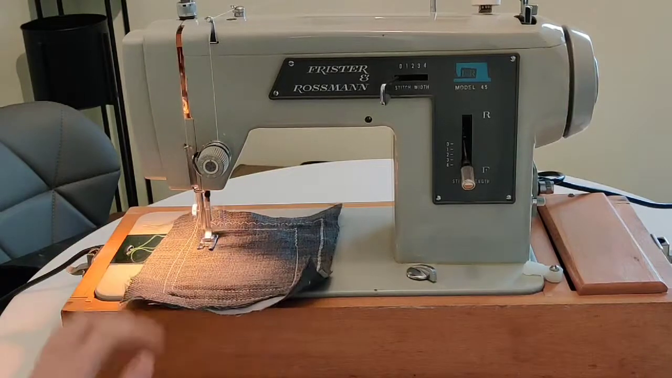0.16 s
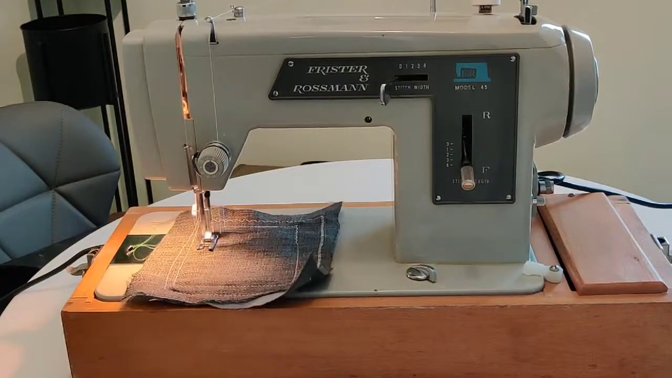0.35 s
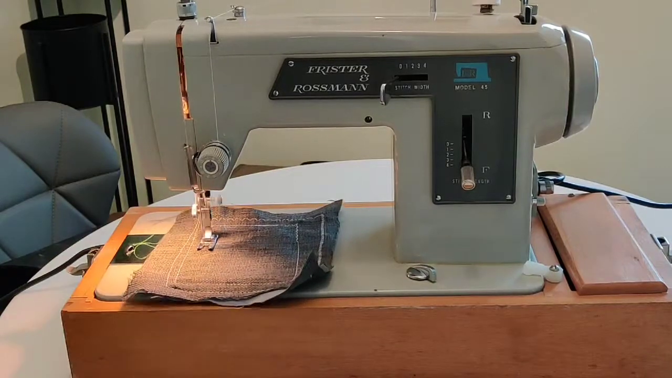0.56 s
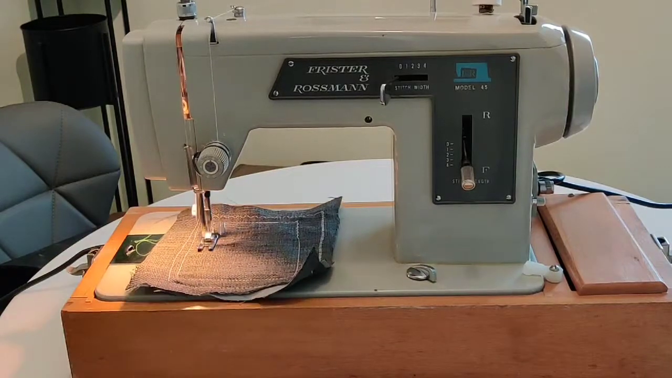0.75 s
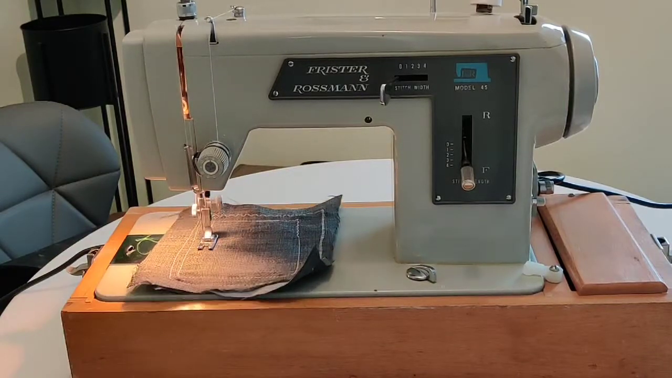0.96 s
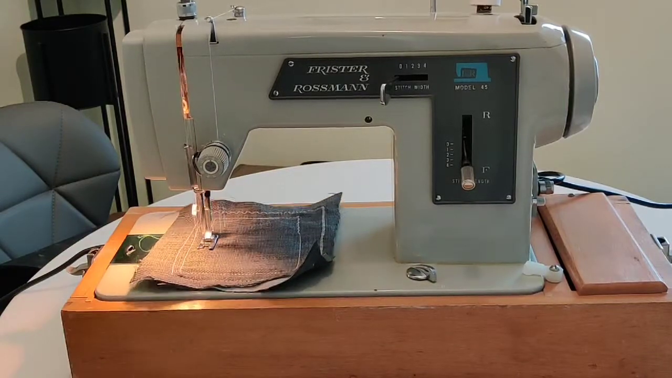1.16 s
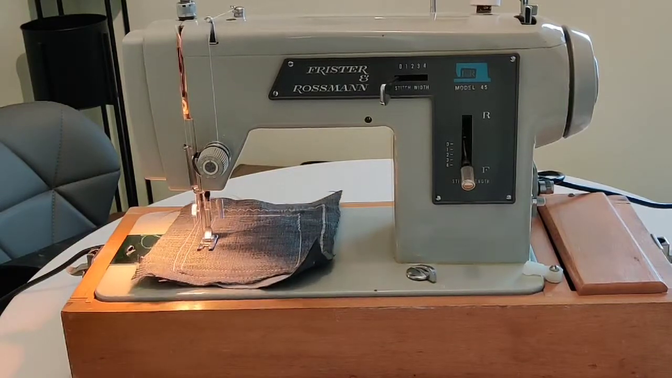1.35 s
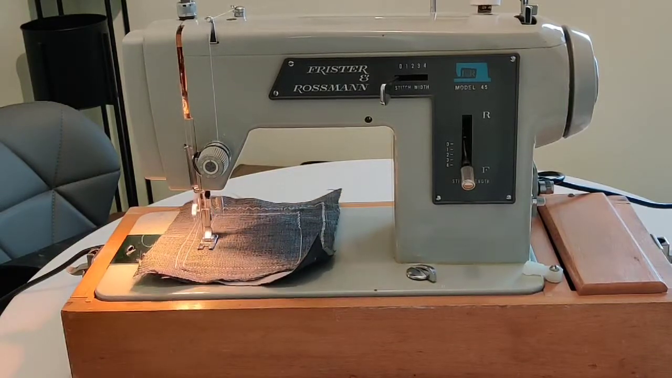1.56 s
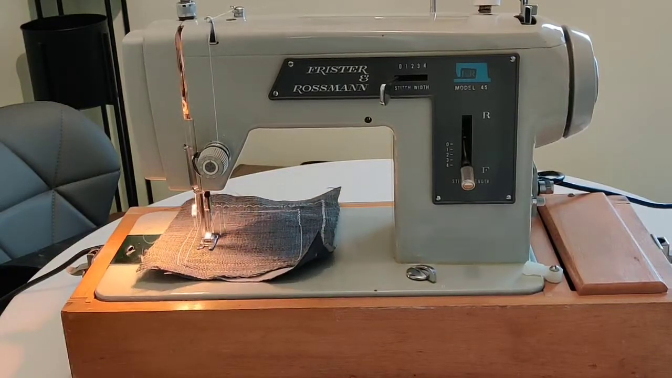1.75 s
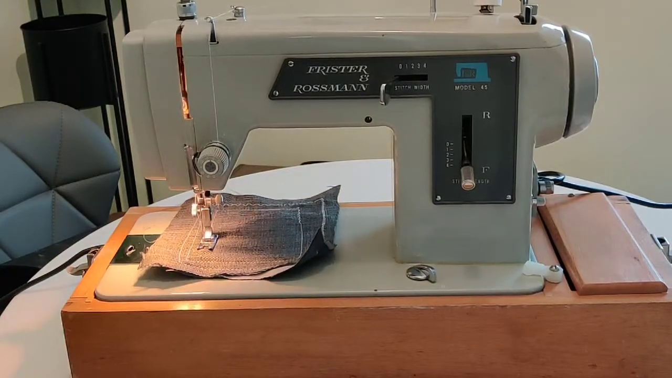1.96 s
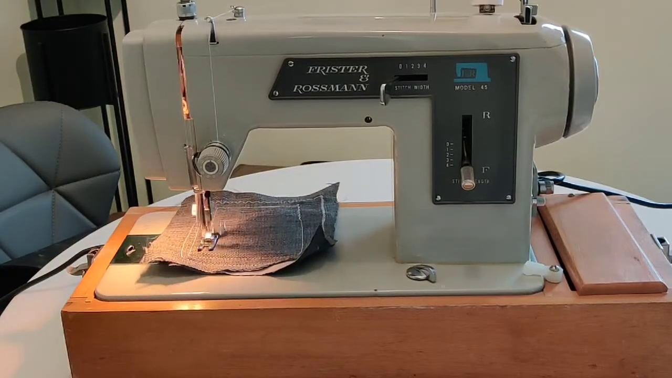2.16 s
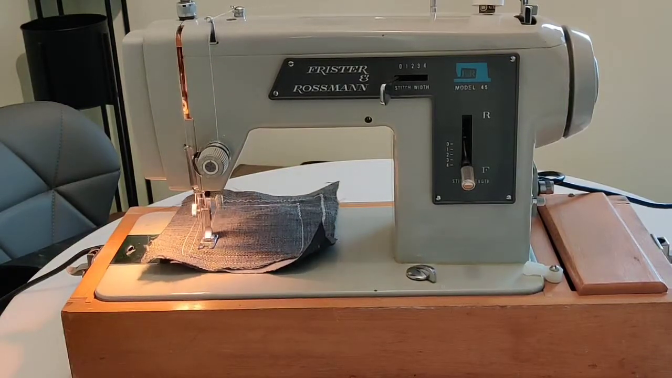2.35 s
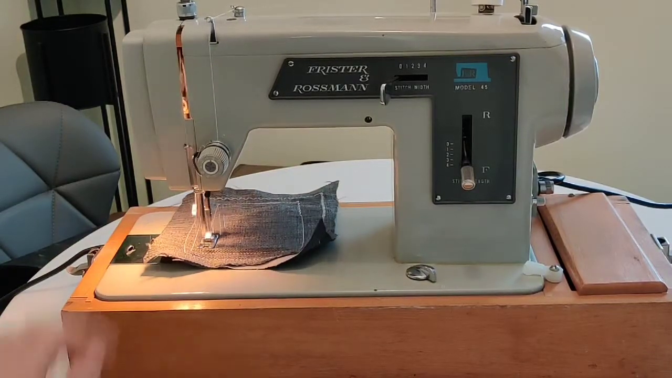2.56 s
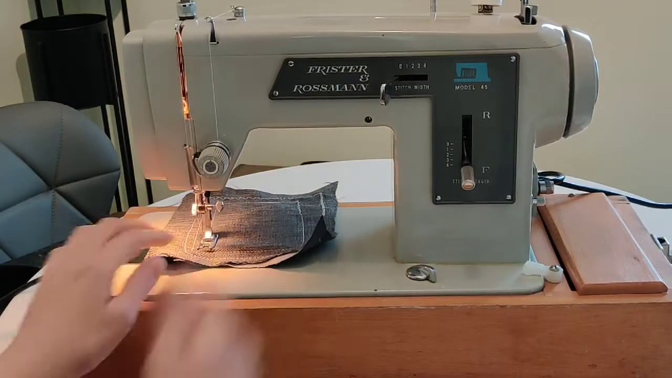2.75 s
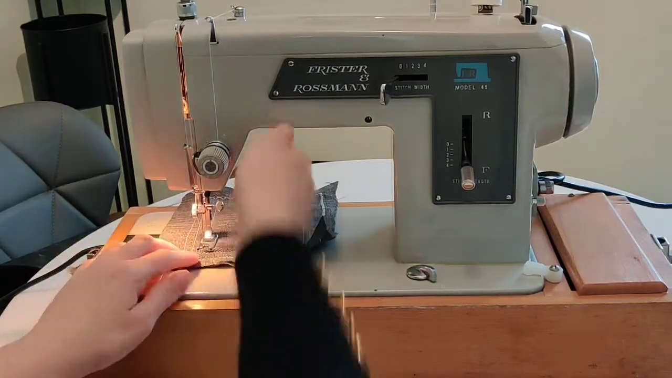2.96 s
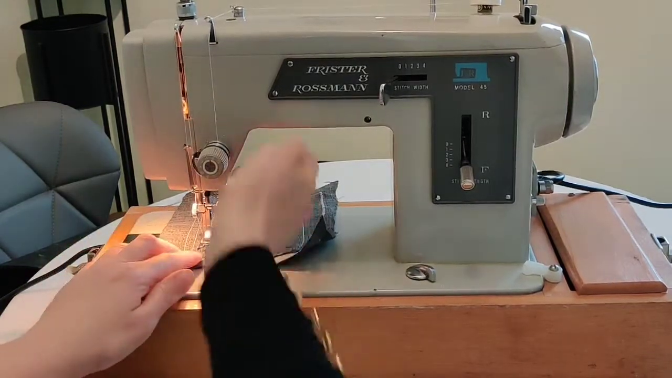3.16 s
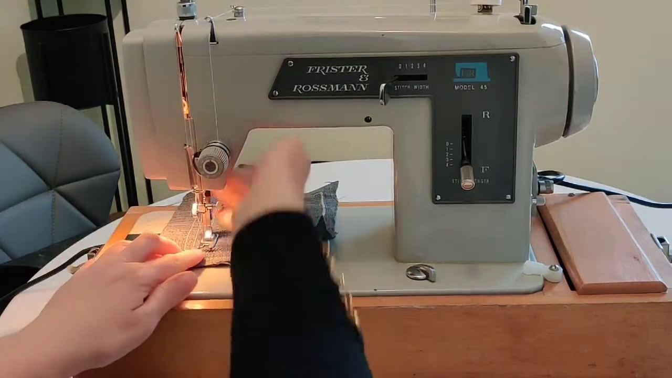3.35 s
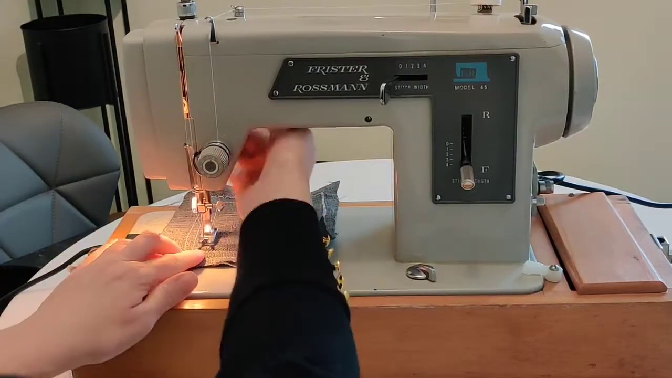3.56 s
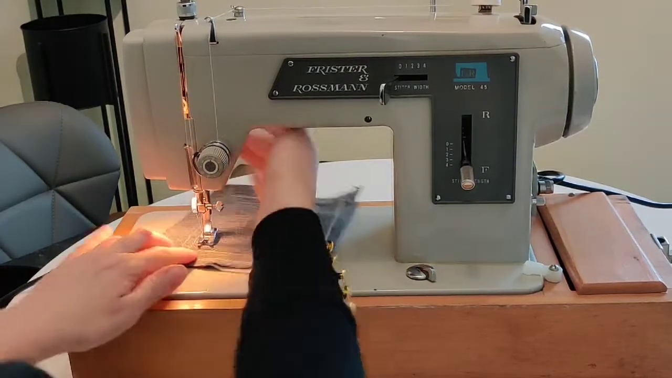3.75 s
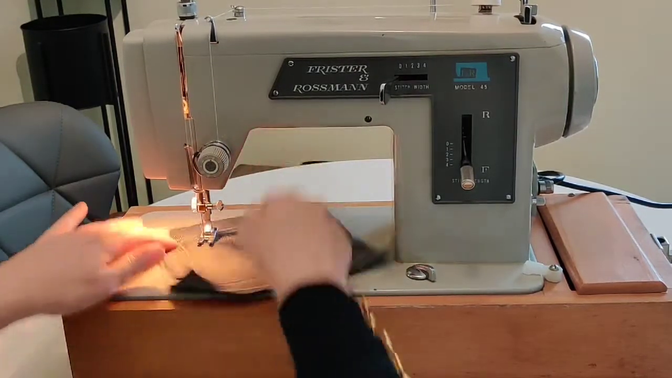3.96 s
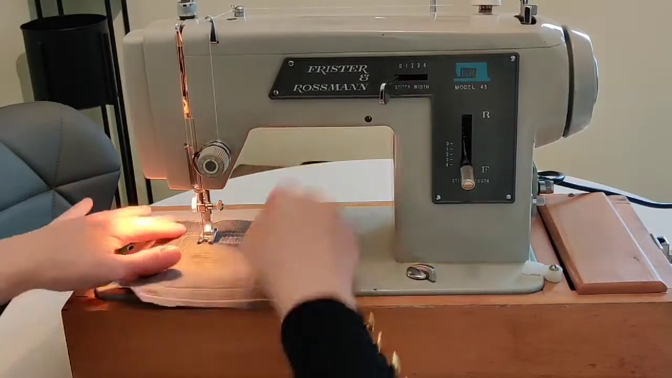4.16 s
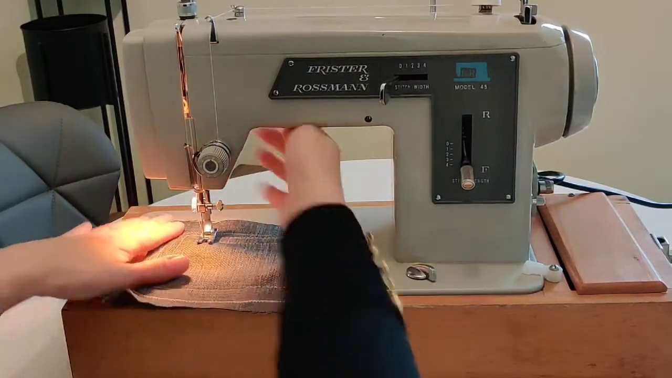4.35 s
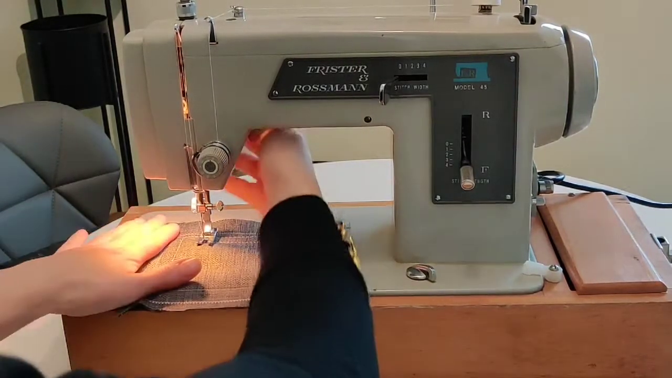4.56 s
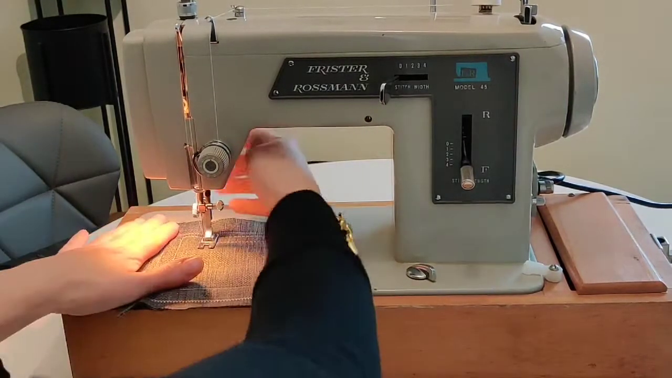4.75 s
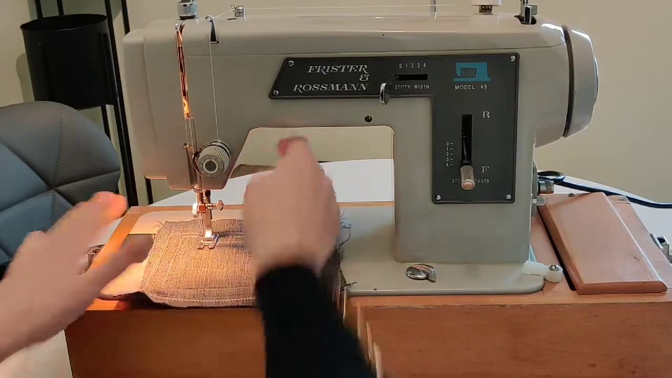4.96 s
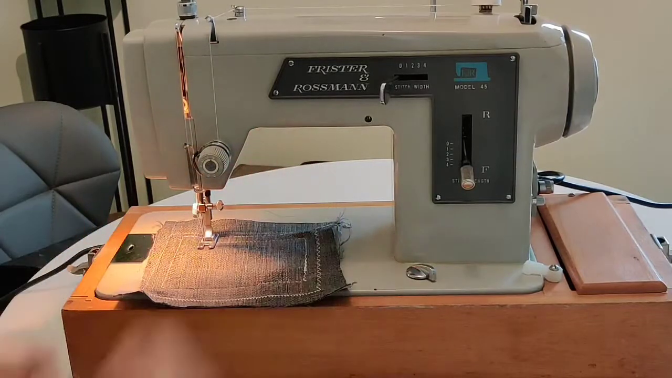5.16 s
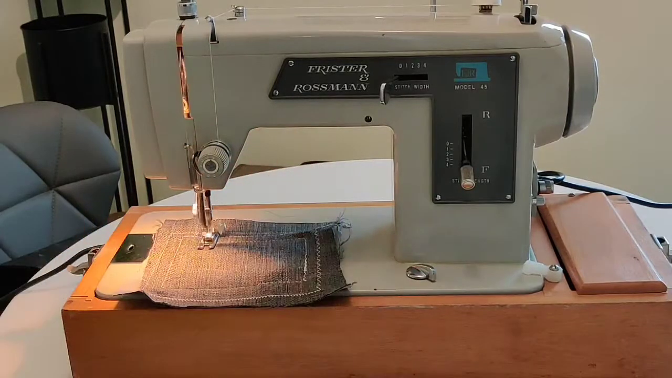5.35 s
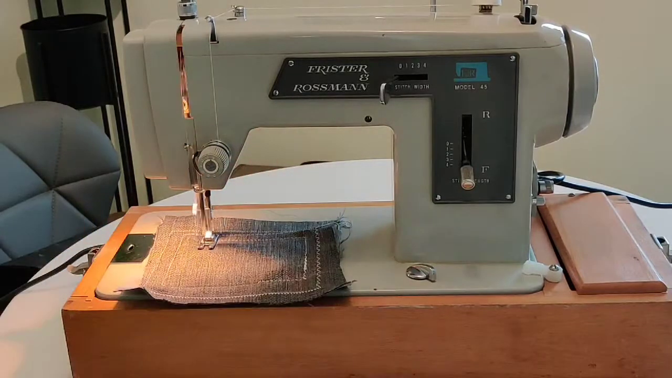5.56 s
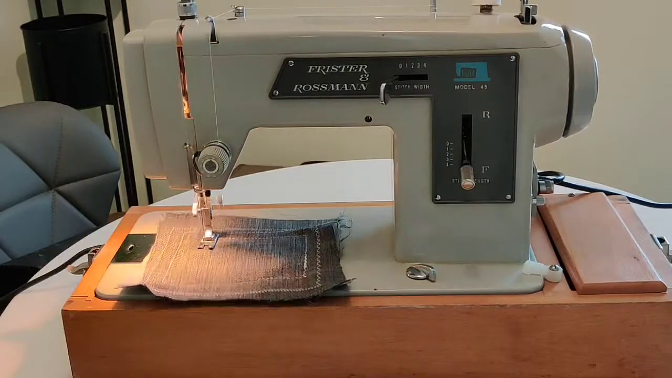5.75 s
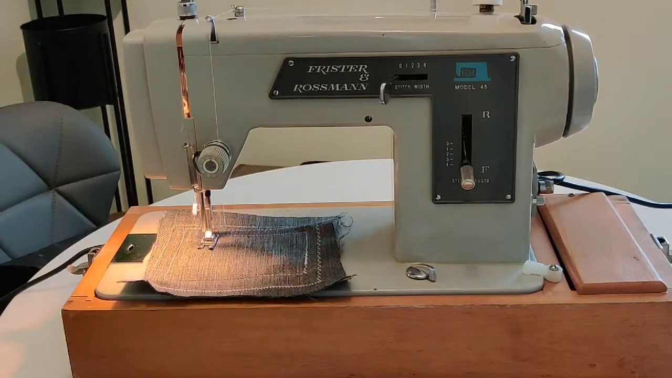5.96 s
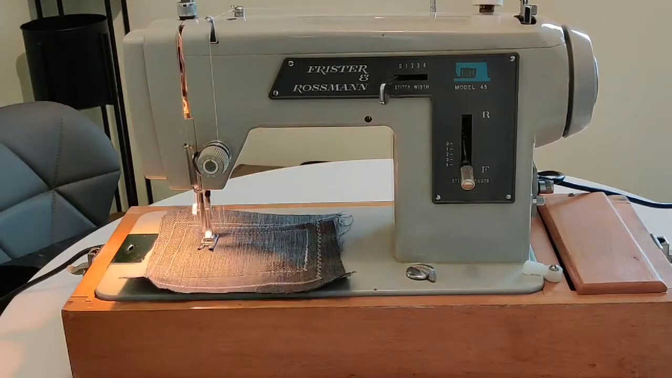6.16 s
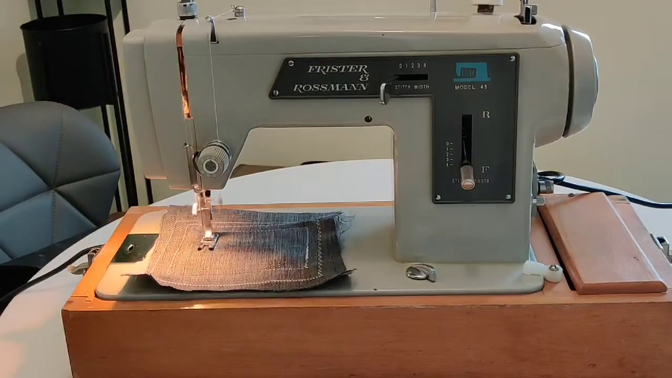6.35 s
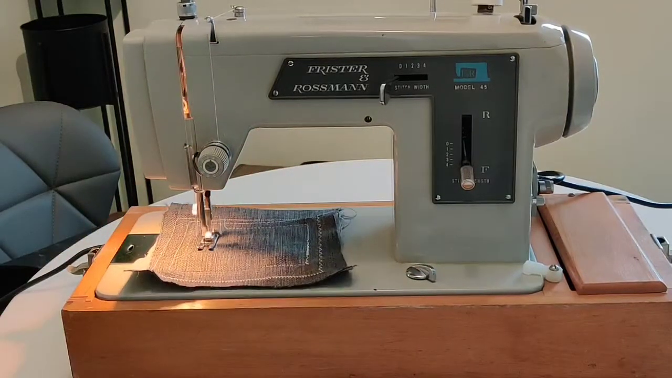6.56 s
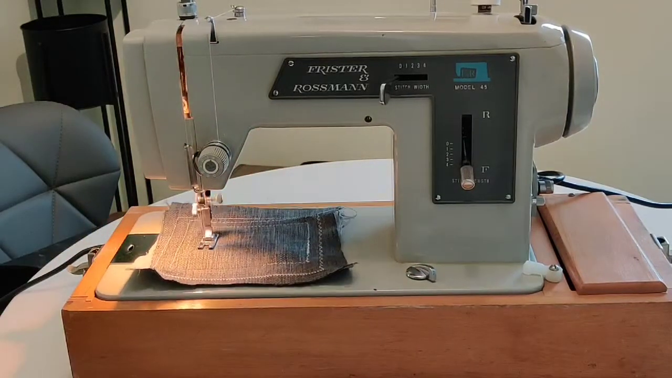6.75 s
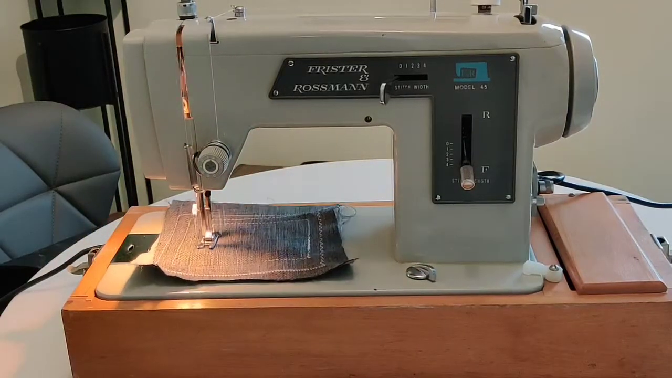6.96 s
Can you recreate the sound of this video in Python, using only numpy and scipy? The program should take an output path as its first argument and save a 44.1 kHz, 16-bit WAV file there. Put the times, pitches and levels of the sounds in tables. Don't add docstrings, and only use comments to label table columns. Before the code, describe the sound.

A heavy metal sewing machine already runs at the start, each stitch a double clack ringing the body over droning gears. It slows and stops; near quiet follows, with faint hum, dull fabric rustle, fingertip and knuckle knocks, and three bright lever snaps. Later clicks lead to a hesitant restart, a few separate clunks, then a steady run to the end. Close stereo microphone, small room.

```python
import sys
import numpy as np
from scipy import signal
from scipy.fft import rfft, irfft, next_fast_len
from scipy.io import wavfile
from scipy.ndimage import uniform_filter1d

SR = 44100
rng = np.random.default_rng(int(sys.argv[2]) if len(sys.argv) > 2 else 0)


def invert_db(level):
    return 10 ** (np.asarray(level, dtype=float) / 20)


def wrap_up_sound(samples):
    columns = np.atleast_2d(samples).T
    tamed = np.clip(columns, -1, 1)
    steps = np.round(tamed * 32767).astype(np.int16)
    wavfile.write(sys.argv[1], SR, steps)


N = 309121
T = np.arange(N) / SR
SIZE = next_fast_len(N + SR)
HZ = np.arange(SIZE // 2 + 1) * SR / SIZE


def machine():
    drive_db = pedal()
    down_s, needle, needle_clack = needle_blows(drive_db)
    back_s, shuttle, shuttle_clack = shuttle_blows(drive_db)
    body = body_ring(needle, shuttle, turning_shafts(drive_db)) + feed_dog(drive_db)
    since_down = T - np.append(-1, down_s)[np.searchsorted(down_s, T)]
    since_back = T - np.append(-1, back_s)[np.searchsorted(back_s, T)]
    shaken_db = 5 * np.exp(-since_down / .018) + 3 * np.exp(-since_back / .03)
    rattle = gear_rattle(drive_db, shaken_db)
    hiss = motor_hiss(drive_db, shaken_db)
    return radiated(body) + clacks(needle_clack + shuttle_clack) + table_shake(drive_db) + rattle + hiss


# t/s, level/dB
DRIVE = [
    [(0.0, -1), (1.1, -0.7), (2.7, -1.5), (2.82, -5), (2.89, -10), (2.98, -39), (3.15, -63)],
    [(5.33, -63), (5.345, -34), (5.47, -26), (5.5, -28), (5.6, -16), (5.72, -13.5), (5.75, -8),
     (5.82, -11.5), (5.97, -4), (6.15, -2.4), (7.01, -0.5)],
]


def pedal():
    return np.maximum(*map(curve, DRIVE))


# t/s, angle/turns
WHEEL = [
    [(.041, 0), (.791, 6), (1.295, 10), (2.054, 16), (2.436, 19), (2.695, 21), (2.829, 22), (2.971, 23)],
    [(5.655, 0), (5.733, .418), (5.805, 1), (5.945, 2), (6.075, 3), (6.201, 4), (6.955, 10), (7.081, 11)],
]
PLAY_S = .0004


def strokes(turn):
    times = []
    for run in WHEEL:
        s, turns = np.transpose(run)
        times.append(np.interp(np.arange(turn, turns[-1] + 1e-6), turns, s))
    times = np.concatenate(times)
    times = times[times < T[-1] - .01]
    return times + PLAY_S * rng.standard_normal(len(times))


# t/s, ring level/dB, clack level/dB
NEEDLE_ACCENT = [(0.041, -1, -2.5), (0.166, 0.5, 0.5), (0.291, -1.5, 1), (0.416, -3, -7),
                 (0.541, -2.5, 1.5), (0.666, -1.5, -3), (0.791, -1.5, 3.0), (0.917, 0.0, 7.5),
                 (1.043, -1, 6), (1.169, -0.5, -4.5), (1.295, 1, -3), (1.422, -2, 1.0), (1.548, -2.5, 2.0),
                 (1.674, 0, 3), (1.801, 2.0, -9), (1.927, -1.0, 0.5), (2.054, -3, 3.5), (2.181, 0.5, 5),
                 (2.309, 0.5, -5), (2.436, -1, -5), (2.566, -0.5, -7), (2.695, -1.5, -1.5),
                 (2.829, 1.5, -6), (2.971, 0.0, 10), (5.655, -7, 4), (5.805, 2.5, -4), (5.945, -2, 2),
                 (6.075, -1.5, 4), (6.201, -0.5, 1), (6.327, 1.5, 4), (6.452, -1, 0.5), (6.578, -1, -6),
                 (6.704, -4, 5), (6.829, -1.5, 0), (6.955, -1, 2)]
NEEDLE_RING, NEEDLE_CLACK = (-33, 1.05, .3), (-22.5, 0.8, .3)


def needle_blows(drive_db):
    s = strokes(0)
    ring_db = force(s, drive_db, NEEDLE_RING) + accent(s, NEEDLE_ACCENT, axis=1)
    clack_db = force(s, drive_db, NEEDLE_CLACK) + np.clip(accent(s, NEEDLE_ACCENT, axis=2), -3, 3)
    return s, blows(s, ring_db + 5, .006, -21), blows(s, clack_db + 21.5, 0.0048, -11.0)


# t/s, ring level/dB
SHUTTLE_ACCENT = [(0.093, -1), (0.218, -4.0), (0.343, 1.5), (0.468, 1), (0.593, 2), (0.718, 0),
                  (0.844, -3.5), (0.97, 0.5), (1.096, 1), (1.222, -1), (1.348, 0), (1.474, -7),
                  (1.601, 1.0), (1.727, -2.5), (1.854, -4), (1.98, 1), (2.107, 0.5), (2.235, 0.5),
                  (2.362, -0.5), (2.49, -1), (2.62, -0.5), (2.751, 0.0), (2.888, -9), (5.733, -3),
                  (5.864, 2.5), (5.999, -1.5), (6.128, 0), (6.254, 1.5), (6.379, -4.5), (6.505, -3.5),
                  (6.631, -1.0), (6.756, -1), (6.882, -4)]
# t/s, ring level/dB, clack level/dB
SLACK = [
    (5.537, -59, -35.5),
    (5.605, -58.5, -32.5),
]
SHUTTLE_RING, SHUTTLE_CLACK = (-28, 1.27, .3), (-33, .7, 1.5)
SHUTTLE_TURN = .418


def shuttle_blows(drive_db):
    swing_s = strokes(SHUTTLE_TURN)
    ring_db = force(swing_s, drive_db, SHUTTLE_RING) + accent(swing_s, SHUTTLE_ACCENT, axis=1)
    clack_db = force(swing_s, drive_db, SHUTTLE_CLACK)
    rows = np.vstack([np.c_[swing_s, ring_db, clack_db], SLACK])
    s, ring_db, clack_db = rows[np.argsort(rows[:, 0])].T
    return s, blows(s, ring_db - 2, .006, -22), blows(s, clack_db + 19.5, 0.007, 5.1)


GEAR_DB = -39.5


def turning_shafts(drive_db):
    strength = invert_db(-35.5 - .28 * drive_db) * invert_db(GEAR_DB + drive_db)
    return strength * invert_db(2 * walk(27)) * grains(1500, 2.0)


# f/Hz, fade by 60 dB/s, needle level/dB, shuttle level/dB, drone level/dB
BODY = [(130, 0.065, -14, -22, -31.5), (189.5, 0.26, -21.5, -18, -10), (288.5, 0.23, -31.5, -20, -10.5),
        (351.6, 0.061, 2.5, -4.5, -11.5), (372, 0.081, -7, -41.5, -14), (452, .22, -2.5, 3, 0),
        (505, 0.023, -2, -53.5, -14), (579, 0.16, -13, -17, -10), (684, 0.17, -17.5, -25.5, -22),
        (791.6, 0.12, -18.5, -14.5, -18.5), (934.5, 0.061, -4.5, -6.5, -2.5),
        (1019.6, 0.064, -10.5, -7.5, -2), (1061, 0.038, -4, -5.5, -27.5), (1517, 0.054, -6.5, -19, -0.5),
        (1775, 0.079, -16.5, -14, -27.5), (2205, 0.056, -11, -11, -28), (3033, 0.14, -14.5, -16, -31)]
# f/Hz, fade/s, needle, shuttle, drone level/dB
ARM = (489, .1, -6, -.5, -8)


def body_ring(needle, shuttle, shafts):
    def mode(hz, t60, needle_db, shuttle_db, drone_db):
        push = invert_db(needle_db) * needle + invert_db(shuttle_db) * shuttle + invert_db(drone_db) * shafts
        return bloom(ring(push, hz, t60), hz, .025)

    return sum(mode(*row) for row in BODY) - mode(*ARM)


# f/Hz, fade by 60 dB/s, level/dB
FEED = [(185, .1, -3.3), (352, .06, 0.92)]
FEED_TURN = .32
FEED_RING = (-44.5, 0.79, 1.0)


def feed_dog(drive_db):
    s = strokes(FEED_TURN)
    push = blows(s, force(s, drive_db, FEED_RING), .006, -25.5)
    return sum(invert_db(db) * bloom(ring(push, hz, t60), hz, .025) for hz, t60, db in FEED)


# f/Hz, level/dB
RADIATES = [(30, -33), (90, -22), (120, 9.5), (300, 2.5), (16000, -4)]


def radiated(body):
    return causal(body, RADIATES)


# f/Hz, level/dB
CLACK = [(500, -28.5), (900, -5), (1500, 4), (2200, -6), (3500, -11), (6000, -21), (12000, -32),
         (16000, -35)]


def clacks(pushes):
    return causal(pushes, CLACK)


# f/Hz, level/dB per Hz
GEARS = [(140, -47), (290, -10.5), (500, -1), (641, -13.5), (917, -12.5), (1200, -13), (1550, -12.5),
         (1670, -14.5), (2950, -13), (4500, -40.5), (5850, -58), (9900, -120)]


def gear_rattle(drive_db, shaken_db):
    teeth = level(colour(spread(2500, 0.34), GEARS), -2.1)
    return invert_db(GEAR_DB + drive_db) * invert_db(shaken_db + 1.7 * walk(40)) * teeth


# f/Hz, level/dB per Hz
MOTOR = [(2060, -10.5), (3500, -4), (4290, -15), (5090, -6.5), (6010, -15), (12100, -20.5), (13300, -22),
         (16000, -25.5)]
MOTOR_DB, MOTOR_SLOPE = -45.5, 0.92
BRAKE_S, BRAKE_LENGTH_S, BRAKE_DB = 2.81, 0.031, 14.5


def motor_hiss(drive_db, shaken_db):
    brake_db = BRAKE_DB * np.exp(-((T - BRAKE_S) / BRAKE_LENGTH_S) ** 2)
    motor = invert_db(MOTOR_DB + MOTOR_SLOPE * drive_db + brake_db)
    brushes = level(colour(spread(6000, 1.8), MOTOR), -0.64)
    return motor * invert_db(0.12 * shaken_db + walk(25)) * brushes


# f/Hz, level/dB per Hz
TABLE = [(15, -26), (25, -9), (40, 6), (52, -11), (64, 5.5), (80, -29), (100, 1.5), (130, -59)]
SHAKE_DB, SHAKE_SLOPE = -58, 3.5


def table_shake(drive_db):
    return invert_db(SHAKE_SLOPE * drive_db) * level(colour(rng.standard_normal(N), TABLE), SHAKE_DB)


# t/s, peak level/dB, thud level/dB, ring of the struck part f/Hz
FINGERTIPS = [(3.403, -52, -0.5, 300), (3.429, -60, -9, 300), (3.514, -61, -2, 350), (3.69, -49.5, 0, 635),
              (4.088, -66, -4, 684), (4.253, -63, -2, 673), (4.79, -64, -8, 654), (4.946, -43, 1, 300)]
KNUCKLES = [(3.25, -38, -8.5, 590), (3.299, -45.5, -9.5, 668), (3.481, -52.5, -13, 762),
            (4.307, -53.5, -10, 665), (4.359, -57.5, -8, 665), (5.483, -36, -22, 724)]
LEVER = [(2.966, -42, -4.5, 895), (3.224, -57, -13, 1204), (3.238, -55, -22, 1500), (3.337, -51, -31, 1500),
         (3.708, -27, -16.5, 1270), (3.816, -27, -18, 1340), (3.922, -32, -16, 931),
         (4.727, -54, -7.5, 1390), (4.925, -41.5, -8.5, 900)]
LATCH = [(4.901, -39, -8.5, 3330), (5.104, -32.5, -21, 4740), (5.292, -55, -31, 684),
         (5.344, -46, -42, 3200), (5.482, -41.5, -39, 4960)]
# knock level/dB, tick level/dB
CONTACT = [
    (-8, -32),
    (-2, -33),
    (0.5, -12),
    (-4.5, -4),
]
# f/Hz, fade by 60 dB/s, level/dB
THUD = [(64.7, 0.034, -16), (150, 0.053, -19), (183, 0.053, 1), (262, 0.016, 7), (329, 0.035, -3),
        (448, 0.051, -3)]
# f/Hz, level/dB
KNOCK = [(300, -42), (520, 8.5), (750, 0), (1300, 0), (2100, -5), (2800, -5.5), (4500, -24.5)]
# f/Hz, level/dB
TICK = [(1000, -26), (2000, -4), (2700, 2), (3500, 8.5), (4100, -1.5), (4700, 8.5), (5500, 2), (7000, 3.5),
        (11000, -5.5), (16000, -16)]
PART_T60_S = .018


def knocks():
    rows = []
    for hits, share in zip((FINGERTIPS, KNUCKLES, LEVER, LATCH), CONTACT):
        rows += [(*hit, *share) for hit in hits]
    s, db, thud_db, part_hz, knock_db, tick_db = np.transpose(rows)
    push = blows(s, db + thud_db + 8.5, 0.018, -10.0)
    thud = sum(invert_db(g) * bloom(ring(push, hz, t60), hz, 0.033) for hz, t60, g in THUD)
    knock = causal(blows(s, db + knock_db + 24.5, 0.02, -6), KNOCK)
    tick = causal(blows(s, db + tick_db + 21.0, 0.012, -5), TICK)
    part = 0
    for t, g, hz in zip(s, db + np.maximum(knock_db, tick_db), part_hz):
        part = part + ring(blows([t], [g - 5], 0.019, -8.5), hz, PART_T60_S)
    return thud + knock + tick + part


# f/Hz, level/dB, fade by 60 dB/s
LEVER_ARM = [(452, -2, 0.21), (573, -8, 0.27), (931, -16, 0.096), (802, -12, 0.074), (1260, -10, 0.068),
             (1490, -11, 0.055), (1810, -7.5, 0.068), (2026, -6, 0.073), (3170, 0, 0.04), (3840, -7, 0.056),
             (4813, -27, .1), (6800, -13, 0.045)]
FOOT_BAR = [(1270, -2.5, 0.044), (4100, -17, .06), (4400, 2, 0.076), (4640, 6, 0.051), (4660, -5, 0.047),
            (4840, -6, 0.05), (5254, -7, .05), (5230, -8, .07), (5430, -10, 0.05), (6740, -4, .06),
            (7800, -5, .06)]
CLUTCH = [(772, 1.5, 0.041), (2600, -5, 0.034), (3220, 2.5, 0.048), (3430, -4, 0.04), (4000, -9, .06),
          (5210, -2.5, .05), (5150, -9, 0.065), (5570, -6, .07)]
PAWL = [(3050, 2.5, 0.035), (3160, 6, 0.046), (1640, -8, 0.032)]
TAKE_UP = [(1520, -2, 0.054), (1740, -4, .04), (2380, 5, 0.044), (930, -16, .05)]
# t/s, peak level/dB
SNAPS = [
    (LEVER_ARM, [(3.7068, -40.5), (3.816, -43), (3.9223, -44.5), (4.9028, -70)]),
    (FOOT_BAR, [(5.1040, -45.5)]),
    (CLUTCH, [(5.4825, -38.5)]),
    (PAWL, [(3.337, -67), (4.9028, -62), (5.342, -45.5)]),
    (TAKE_UP, [(5.537, -51), (5.606, -46.5), (5.655, -51)]),
]


def snaps():
    out = 0
    for modes, rows in SNAPS:
        hit = blows(*np.transpose(rows), 0.0099, -18.5)
        out = out + sum(invert_db(db) * ring(hit, hz, t60) for hz, db, t60 in modes)
    return out


# (f/Hz, width/Hz, level/dB)
SQUEALS = [
    (2.79, .085, -47, [(6700, 300, 0), (5300, 500, -9), (8300, 500, -14)]),
    (5.343, .14, -57, [(1600, 450, -12), (3200, 600, 0), (6550, 400, -7)]),
    (5.36, .11, -53, [(5150, 500, 0), (5600, 500, -8), (1750, 120, -12)]),
]


def squeals():
    out = 0
    for start, length, db, peaks in SQUEALS:
        chatter = grains(2400, 1.0) * invert_db(2 * walk(60))
        tone = 0
        for hz, width, peak_db in peaks:
            t60 = np.log(1000) / (np.pi * width)
            tone = tone + invert_db(peak_db) * level(bloom(ring(chatter, hz, t60), hz, t60), 0)
        swell = np.interp(T - start, [0, .012, length, length + .015], [0.0, 0.97, 0.34, 0], left=0)
        out = out + invert_db(db) * tone * swell
    return out


# start t/s, length/s, rub level/dB, fibre hiss level/dB, shake level/dB
GESTURES = [(2.974, 0.11, -69, -81, -70), (3.163, 0.33, -70, -77, -63.5), (3.596, 0.21, -65, -71, -68),
            (3.95, 0.12, -68, -96, -81), (4.168, 0.23, -74, -88, -97), (4.668, 0.3, -73, -86, -74),
            (4.998, 0.18, -72.5, -65, -83), (5.31, .17, -69.5, -54, -84)]
GRIP_S, LET_GO_S = 0.065, 0.046


def cloth():
    rub, fibres, sway = np.zeros((3, N))
    for start, length, rub_db, fibre_db, sway_db in GESTURES:
        corners = [0, GRIP_S, GRIP_S + length, GRIP_S + length + LET_GO_S]
        drag = np.interp(T - start, corners, [0, 1, 1, 0])
        rub += invert_db(rub_db) * drag
        fibres += invert_db(fibre_db) * drag
        sway += invert_db(sway_db) * drag
    dull = colour(grains(3000, 1.5), [(70, 5), (150, 12.5), (450, 3.5), (1500, -24), (3000, -54)])
    thin = colour(grains(8000, 1.2), [(800, -17), (2000, -10.0), (5000, -12.5), (9000, -16), (16000, -26)])
    table = sway * level(colour(rng.standard_normal(N), TABLE), -1.5)
    dull_rub = rub * invert_db(1.7 * walk(24.7)) * level(dull, 0)
    thin_hiss = fibres * invert_db(8.6 * walk(30)) * level(thin, -7.5)
    return dull_rub + thin_hiss + table


WALLS_T60_S, WALLS_TREBLE_T60_S = 0.38, 0.15
WALLS_DB, WALLS_BASS_DB = -7.5, -9
SCATTER_S = .0009


def walls():
    t = np.arange(SR) / SR
    paths = []
    for scatter_s, tail_db in ((.0001, WALLS_BASS_DB), (SCATTER_S, WALLS_DB), (SCATTER_S, WALLS_DB)):
        early = level(rng.standard_normal(SR) * np.exp(-t / scatter_s), 0)
        noise = rng.standard_normal(SR) * np.clip(t / 0.0093, 0, 1)
        low = signal.lfilter([.16], [1, -1.2, .36], noise)
        tail = low * 1000 ** (-t / WALLS_T60_S) + (noise - low) * 1000 ** (-t / WALLS_TREBLE_T60_S)
        paths.append(level(early + level(tail, tail_db), 0) / np.sqrt(SR))
    paths[0][:32] = np.sqrt(np.sum(paths[0][:32] ** 2)) * (np.arange(32) == 0)
    heard = two_ports(*paths)
    even = two_ports(*np.eye(1, 8)[[0, 0, 0]])
    return heard * np.sqrt(smooth(even) / smooth(heard))


# f/Hz, level/dB per Hz
ROOM = [(12, -27.5), (20, 8.5), (70, -7), (123, -9), (241, -20.5), (310, -13.5), (3530, -27), (4200, -30),
        (5100, -23.5), (5700, -37), (6360, -30.5), (14700, -28), (16000, -45.5)]
ROOM_DB = -73.5
HUM_HZ, HUM_DB = 118.4, -72.5


def room_tone():
    air = irfft(two_ports(*rng.standard_normal((3, N))) * invert_db(shape(ROOM)), SIZE)[:, :N]
    hum = invert_db(HUM_DB + 2) * np.sin(2 * np.pi * HUM_HZ * T)
    return level(air, ROOM_DB) * invert_db(0.74 * walk(2.4)) + hum


# f/Hz, level/dB
PORTS = [(30, 4), (700, 4.2), (2500, 3.6), (5000, 8), (7000, 1), (16000, .5)]
ALIKE_HZ = 1420
LEFT_LAG_S = 4 / SR


def two_ports(alike, left, right):
    share = 1 / np.sqrt(1 + (HZ / ALIKE_HZ) ** 4)
    lag = np.exp(-2j * np.pi * HZ * np.array([[LEFT_LAG_S], [0]]))
    own = np.sqrt(1 - share ** 2) * rfft(np.array([left, right]), SIZE)
    tilt = invert_db(np.array([[1], [-1]]) * shape(PORTS) / 2)
    return (share * lag * rfft(alike, SIZE) + own) * tilt


def smooth(spectrum):
    return uniform_filter1d(np.abs(spectrum) ** 2, size=100 * SIZE // SR)


def force(times, drive_db, rule):
    db, slope, scatter_db = rule
    return db + slope * np.interp(times, T, drive_db) + scatter_db * rng.standard_normal(len(times))


def accent(times, rows, axis):
    rows = np.transpose(rows)
    return np.interp(times, rows[0], rows[axis])


def blows(times, db, rattle_s, rattle_db):
    out, t = np.zeros(N + 2048), np.arange(2048) / SR
    for s, gain in zip(times, invert_db(db)):
        bounces = rng.standard_normal(2048) * (rng.random(2048) < .08)
        burst = invert_db(rattle_db) * np.exp(-t / rattle_s) * bounces
        burst[0] = 1
        out[int(s * SR):][:2048] += gain * burst / np.sqrt(np.sum(burst ** 2))
    return out[:N]


def ring(x, hz, t60):
    r, w = 1000 ** (-1 / (t60 * SR)), 2 * np.pi * hz / SR
    return signal.lfilter([.5, 0, -.5], [1, -2 * r * np.cos(w), r * r], x)


def bloom(x, hz, t60):
    return 2 * (1 - 1000 ** (-1 / (t60 * SR))) * ring(x, hz, t60)


def grains(per_s, spread_db):
    size = invert_db(spread_db * rng.exponential(size=N)) * rng.standard_normal(N)
    return level(size * (rng.random(N) < per_s / SR), 0)


def spread(per_s, spread_db):
    sides = np.array([grains(per_s, spread_db), grains(per_s, spread_db)])
    return .45 * grains(per_s, spread_db) + .9 * sides


def walk(rate):
    k = int(SR / rate)
    return uniform_filter1d(np.repeat(rng.standard_normal(N // k + 1), k), k)[:N]


def curve(rows):
    s, db = np.transpose(rows)
    return np.interp(T, s, db, left=-150, right=-150)


def level(x, db):
    return x * invert_db(db) / np.sqrt(np.mean(x ** 2))


def shape(points):
    hz, value = np.transpose(points)
    return np.interp(np.log(HZ + 1), np.log(hz + 1), value)


def colour(x, points):
    return irfft(rfft(x, SIZE) * invert_db(shape(points)), SIZE)[..., :N]


def causal(x, points):
    cepstrum = irfft(np.log(invert_db(shape(points))), SIZE)
    cepstrum[1:SIZE // 2] *= 2
    cepstrum[SIZE // 2 + 1:] = 0
    return irfft(rfft(x, SIZE) * np.exp(rfft(cepstrum)), SIZE)[:N]


def scene():
    dry = machine() + knocks() + snaps() + squeals() + cloth()
    return irfft(rfft(dry, SIZE) * walls(), SIZE)[:, :N]


def low_pass(x):
    return signal.sosfilt(signal.butter(12, 16390, fs=SR, output="sos"), x)


MIC_HZ, MIC_WIDTH_HZ, MIC_DB = 5020, 520, 6.5
TOP_HZ = 15800


def record(dry):
    peak = signal.lfilter(*signal.iirpeak(MIC_HZ, MIC_HZ / MIC_WIDTH_HZ, fs=SR), dry)
    heard = dry + (invert_db(MIC_DB) - 1) * peak + room_tone()
    top = signal.ellip(10, .2, 60, TOP_HZ, fs=SR, output="sos")
    mix = signal.sosfilt(top, heard)
    return low_pass(mix)


dry = scene()
out = record(dry)
wrap_up_sound(out)
```